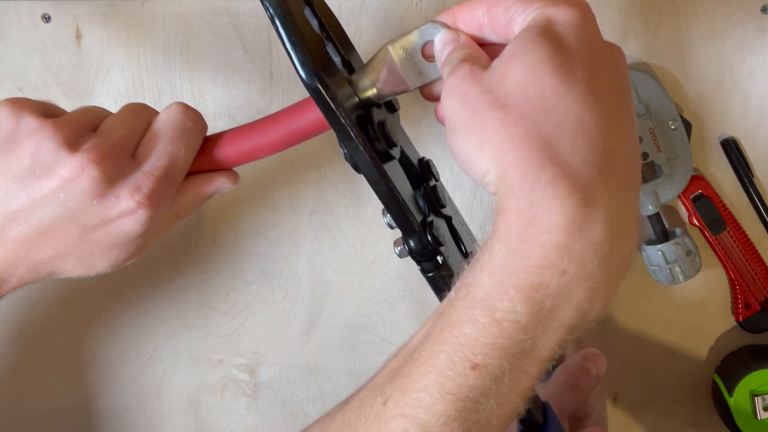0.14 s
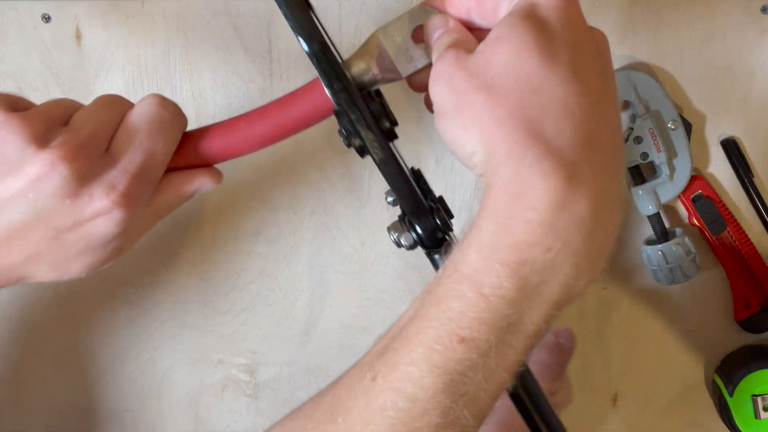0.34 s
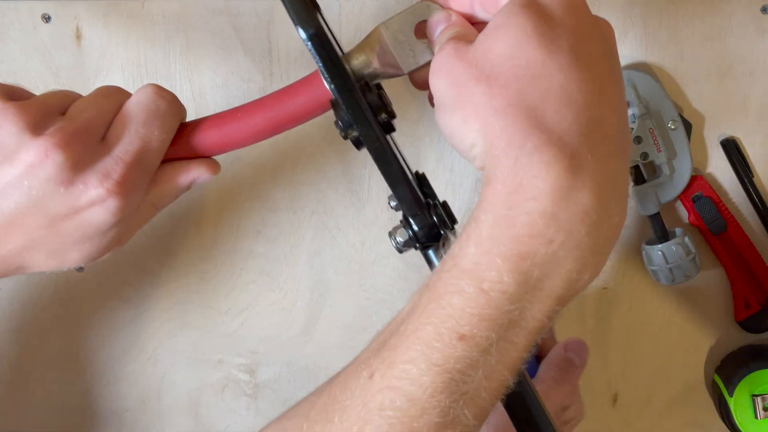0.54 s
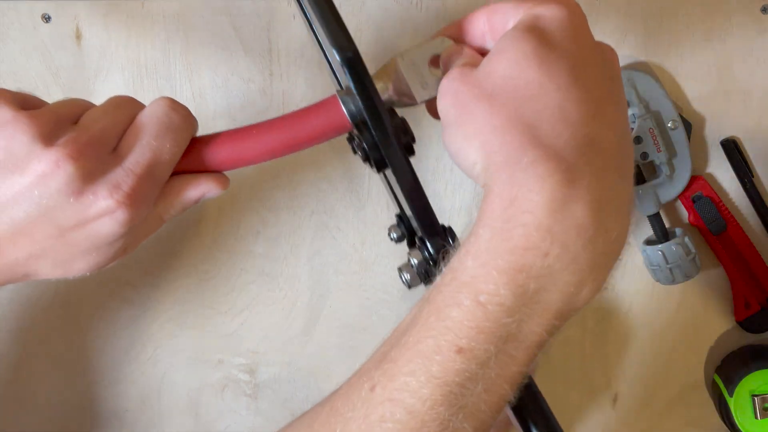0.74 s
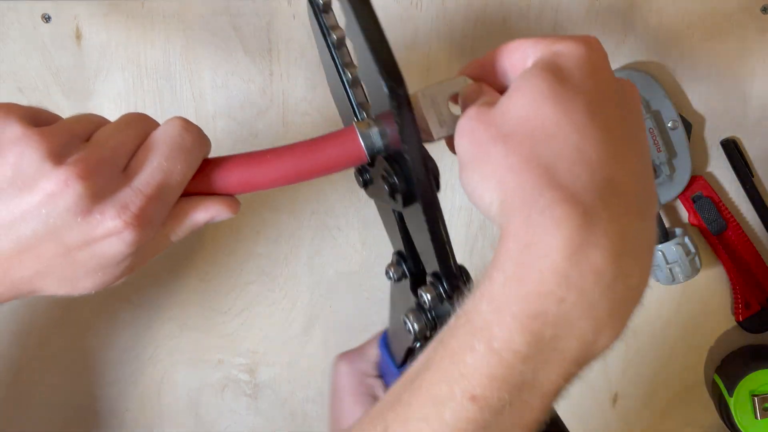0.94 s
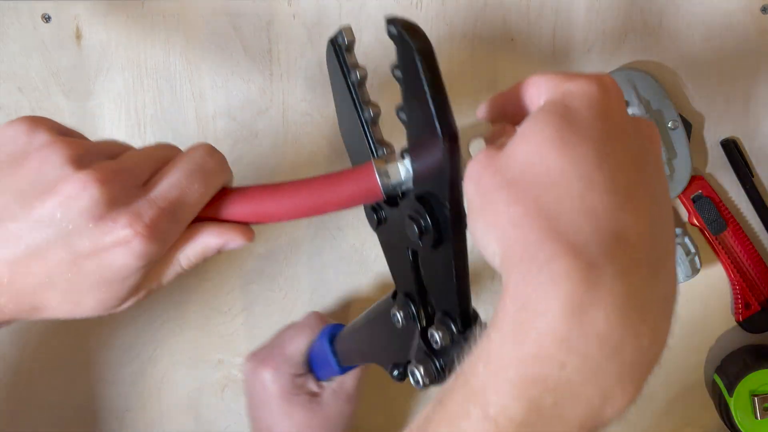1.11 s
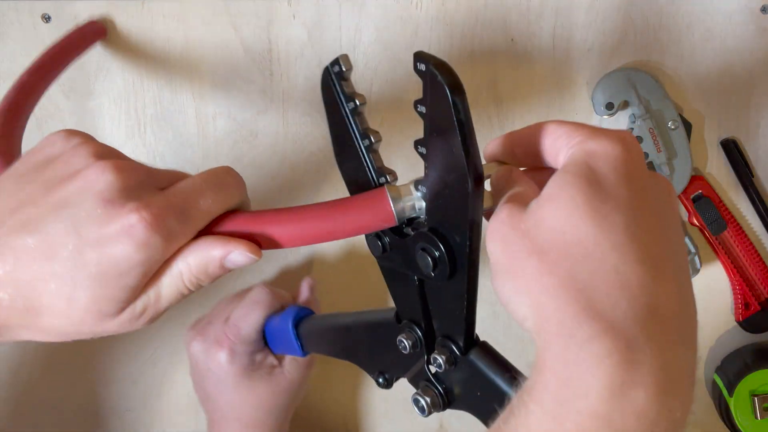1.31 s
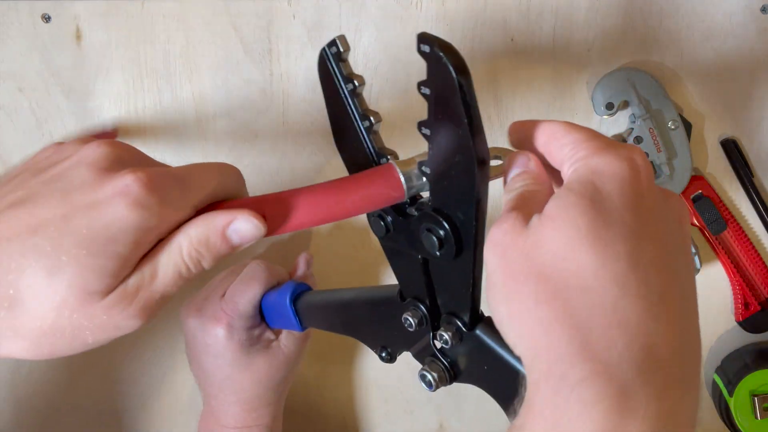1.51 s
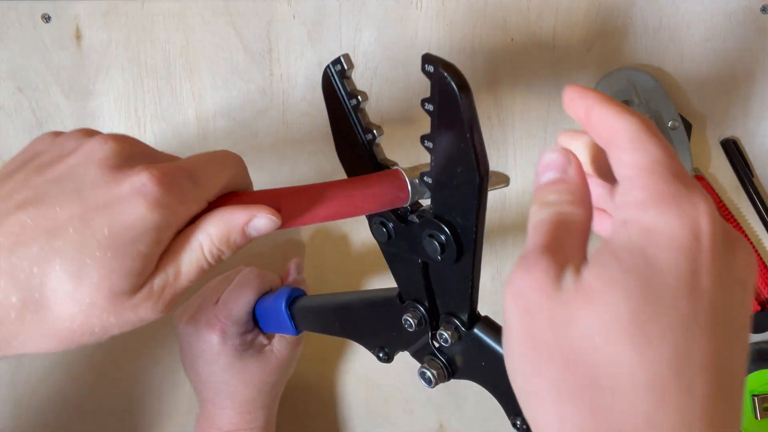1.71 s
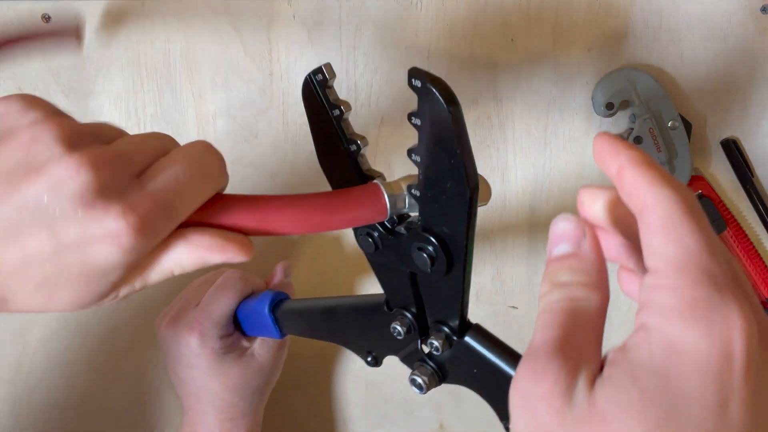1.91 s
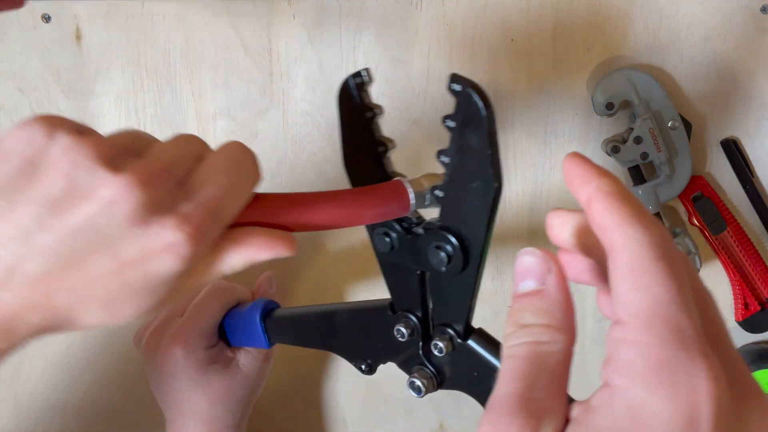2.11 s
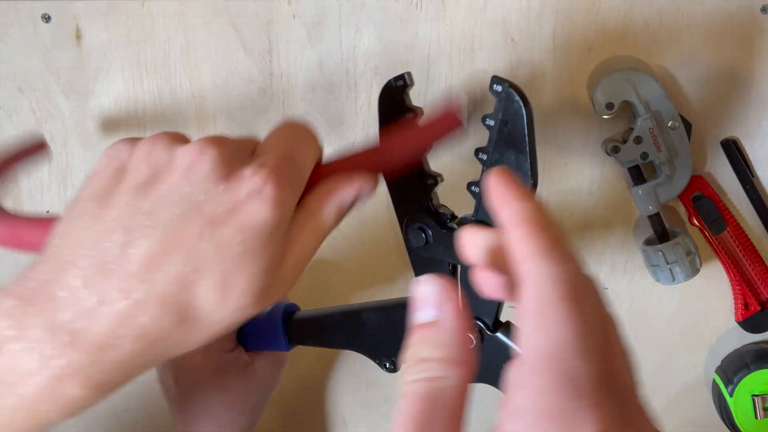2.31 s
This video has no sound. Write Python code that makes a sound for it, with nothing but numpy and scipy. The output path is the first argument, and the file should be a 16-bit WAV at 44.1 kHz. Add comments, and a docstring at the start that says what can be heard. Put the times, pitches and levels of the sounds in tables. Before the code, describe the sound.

A heavy steel crimping tool thumps a wooden bench at 0.22 seconds, loudest and boomy, with a short metallic rattle. Gritty sliding over wood and papery skin and cable rustle follow from 0.35 to 0.7, then faint bumps until 1.1. Duller thuds with jaw clicks land at 1.26 and 1.96; crisp metal clicks come at 2.3. Close phone pickup, short room tail, soft low hush.

```python
"""Crimping tool on a wooden bench

Three heavy thumps and lighter bumps, from a steel crimping tool laid and knocked down, ring the bench top's modes.
Loose jaws and a metal lug click and rattle: sharp touches and random tiny impacts ring steel modes, with noise.
Skids and hands shake the bench, something slides over the wood, and skin and cable rustle as shaped noise.
Behind them are a short room tail and the soft hush of a quiet workshop, heard by a phone just above.
"""
import sys
import numpy as np
from scipy import signal
from scipy.fft import rfft, irfft
from scipy.io import wavfile
from scipy.ndimage import uniform_filter1d

SR = 44100
rng = np.random.default_rng(int(sys.argv[2]) if len(sys.argv) > 2 else 0)


def boost(x):
    """Linear amplitude factor 10**(x/20) for a level x in decibels (scalar or array-like)."""
    u = np.asarray(x, float) / 20
    return 10 ** u


def inscribe(sig):
    """Save sig as 16-bit PCM at rate SR to the path in sys.argv[1].

    A 1-D sig is mono; a 2-D sig holds one channel per row.
    Samples are clipped to [-1, 1] before scaling.
    """
    pcm = np.round(np.clip(np.atleast_2d(sig).T, -1, 1) * 32767)
    wavfile.write(sys.argv[1], SR, pcm.astype(np.int16))


N = 103635
TIME_S = np.arange(N) / SR

# ringing modes of the steel jaws and lug: (frequency [Hz], level [dB], 60 dB fade before the cap [s])
STEEL_MODES = [(640, -14, 0.08), (850, -10, .03), (1010, -13, 0.04), (1230, -7, .03), (1490, -6, 0.025),
               (1690, -9, .03), (2010, -7, 0.02), (2352, -5, 0.035), (2540, -9, 0.04), (2830, -7, 0.03),
               (3055, -4, 0.035), (3540, -10, 0.029), (4450, -12, .03), (5900, -10, .012)]
STEEL_T60_MAX_S = 0.045  # cap on the steel fades


def curve(rows, low_db=-120):
    """Turns rows that start with (time [s], level [dB]) into a gain over time, low_db outside them."""
    r = np.array(rows)
    return boost(np.interp(TIME_S, r[:, 0], r[:, 1], low_db, low_db))


def by_hz(rows):
    """Spreads (frequency [Hz], value) rows over every FFT bin, on a log frequency scale."""
    r = np.array(rows)
    bin_hz = np.arange(N // 2 + 1) * SR / N
    return np.interp(np.log(bin_hz + 1), np.log(r[:, 0]), r[:, 1])


def colour(x, rows):
    """Shapes a sound by a spectrum and brings its rms to 1."""
    y = irfft(rfft(x) * boost(by_hz(rows)), N)
    return y / np.sqrt(np.mean(y ** 2, -1, keepdims=True))


def ring(x, hz, t60):
    """Lets x drive one mode that fades by 60 dB in t60 seconds."""
    pole = np.exp((2j * np.pi * hz - np.log(1000) / t60) / SR)
    return signal.lfilter([1], [1, -pole], x).imag


def flicker(rate, db):
    """Gain that wanders between random levels, rate new ones a second; db sets the depth."""
    k = int(SR / rate)
    steps = np.repeat(rng.standard_normal(N // k + 1), k)
    return boost(0.93 * db * uniform_filter1d(steps, k)[:N])


def grains(rate, spread_db):
    """Tiny impacts at random moments, rate a second on average, a few much bigger."""
    hits = rng.random(N) < rate / SR
    return hits * rng.standard_normal(N) * boost(spread_db * rng.exponential(1, N))


def blows(hz, top_hz):
    """Soft pushes on one mode: low bending waves travel slower, and the place struck weights the mode."""
    # (time [s], level [dB], contact [ms], distance from the phone [m], place across the top [0-1])
    blow_rows = [(0.115, -42.5, 4.9, 0.18, 0.27), (0.2174, -4.5, 1, 0.81, 0.17),
                 (0.254, -17.5, 3.12, 0.78, 0.23), (0.684, -44.5, 3.2, 0.51, 0.27),
                 (0.715, -38.5, 7.3, 0.76, 0.06), (0.976, -43, 6.1, 0.61, 0.09),
                 (1.091, -31.5, 7.5, 0.22, 0.18), (1.255, -32.5, 1.08, 0.47, 0.24),
                 (1.2659, -12.5, 3.57, 0.18, 0.2), (1.2741, -15.5, 6.5, 0.11, 0.15),
                 (1.947, -28.5, 1.9, 0.53, 0.28), (1.951, -21.5, 3.23, 0.12, 0.32),
                 (1.9611, -14.5, 3.58, 0.096, 0.24), (1.9711, -21.5, 3.64, 0.13, 0.32),
                 (2.006, -35, 3.1, 0.13, 0.04), (2.129, -50.5, 4.04, 0.57, 0.29)]
    bend_m_s, shape_turns = 75, 1.306  # wave speed at 100 Hz; how fast mode shapes change across the top
    force, first = np.zeros((2, N)), np.zeros(N)
    for s, blow_db, ms, metres, place in blow_rows:
        at = slice(int(s * SR), int(s * SR) + 2000)
        # delay behind the highest mode
        late = metres / bend_m_s * (np.sqrt(100 / hz) - np.sqrt(100 / top_hz))
        phase = np.clip((TIME_S[at] - s - late) * 1000 / ms, 0, 1)
        # a longer contact is a weaker push, so the impulse stays alike
        push = boost(blow_db) * np.sin(np.pi * phase) ** 2 * 2000 / (ms * SR)
        turn = 2 * np.pi * shape_turns * place * np.sqrt(hz / 100)
        force[:, at] += np.array([[np.cos(turn)], [np.cos(turn + 0.54)]]) * push
        first[at] += push
    return force, first


def skids(hz, rough):
    """Edges skid on the wood: rough grains swell and fade, strongest on modes near each skid's centre."""
    # (start [s], end [s], level [dB], centre [Hz])
    skid_rows = [(0.208, 0.23, -40, 900), (0.563, 0.692, -62.5, 160), (0.606, 0.644, -55.5, 252),
                 (1.041, 1.107, -61.5, 150), (1.048, 1.119, -70, 480), (1.243, 1.264, -56, 500),
                 (1.265, 1.381, -66, 420), (1.915, 1.942, -54, 760)]
    swell = 0
    for start, end, skid_db, mid_hz in skid_rows:
        level = boost(skid_db - 77 * np.log2(hz / mid_hz) ** 2)
        swell = swell + level * np.sin(np.pi * np.clip((TIME_S - start) / (end - start), 0, 1))
    return rough * swell


def handling(hz, grit):
    """Hands press and shift: flickering noise shakes the bench, with a changing tilt to the higher modes."""
    # (time [s], level [dB], tilt [power of frequency over 400 Hz])
    hand_rows = [(0.0, -78.5, 0.24), (0.14, -69.5, 0.089), (0.35, -59, 0.063), (0.49, -62.5, 0.2),
                 (0.76, -69.5, 0.1), (1.23, -74.5, 0.2), (1.39, -69, 0.16), (1.6, -100.5, 0.21),
                 (1.79, -77, 0.31), (1.98, -73, 0.21), (2.09, -84, 0.1), (2.35, -85.5, 0.39)]
    tilt = np.interp(TIME_S, *np.array(hand_rows)[:, ::2].T)
    return grit * curve(hand_rows) * boost(-11.5) * (hz / 400) ** tilt


def bench():
    """Blows, skids and hands ring the modes of the bench top; gives mid and side."""
    # modes of the bench top: (frequency [Hz], level [dB], 60 dB fade [s])
    bench_modes = [(71.62, -7.5, 0.75), (80.25, -23.5, 0.53), (112.94, -2.5, 0.21), (133.97, -5, 0.43),
                   (152.2, -16, 0.6), (179.6, -2.5, 0.22), (208.3, -15, 0.2), (250.6, -8, 0.041),
                   (304, -3.5, .1), (347, -13.5, 0.077), (413.2, -1.5, 0.04), (483.4, -14, 0.13),
                   (518, -4.5, .07), (624, -11.5, 0.089), (723, -6.5, 0.037), (792, -17, 0.039),
                   (1022, -20, .04), (1180.3, -14, 0.015), (1667, -49, .025)]
    waver_hz, waver_db = 22, 4  # each ringing mode wavers randomly in loudness
    first_wave_db, first_wave_t60_s = 6, 0.063  # top gain; longest fade of a 400 Hz mode
    side_db, side_hz = 2, 605  # left-right difference, growing up to this frequency
    grit = rng.standard_normal(N) * flicker(27, 0.67) / 8
    rough = grains(2900, 0.99)
    out = 0
    for hz, db, t60 in bench_modes:
        shake = handling(hz, grit) + skids(hz, rough)
        force, first = blows(hz, bench_modes[-1][0])
        force = force + np.array([shake, np.roll(shake, 40)])
        ringing = ring(force, hz, t60) * flicker(waver_hz, waver_db)
        # the wave that runs straight past the phone before the top settles into ringing
        wave_t60 = min(t60, first_wave_t60_s * (400 / hz) ** 0.31)
        wave = boost(first_wave_db) * min(hz / 250, 1) ** 0.5 * ring(first, hz, wave_t60)
        side = boost(side_db) * min(hz / side_hz, 1) ** 3.2
        out = out + boost(db) * (ringing + [wave, np.roll(wave, 12)]) * [[1], [side]]
    return out


def steel_highpass(x):
    """Thins the bass of the ringing steel."""
    return signal.sosfilt(signal.butter(2, 550, "high", fs=SR, output="sos"), x)


def chatter_noise():
    """Noise in the colour of metal chatter, used for cracks and rattles."""
    # (frequency [Hz], spectral level [dB per Hz])
    noise_colour = [(880, -35), (1500, -11.5), (2800, -10), (10300, -17.5), (11900, -30.5), (12500, -57),
                    (15400, -18.5), (16000, -49.5)]
    return colour(rng.standard_normal(N), noise_colour)


def clicks():
    """Each touch of steel is a tap with fine grains that rings the modes, plus a brief noise crack."""
    # (time [s], level [dB], colour centre [octaves above 1 kHz], crack over click [dB], favoured pitch [Hz])
    click_rows = [(.198, -44.5, 2.3, -16, 4100), (.246, -48, 2.2, -9, 2900), (.262, -46.5, 2.4, -10, 2900),
                  (.890, -54.5, 3.55, -1, 3050), (1.2535, -58.5, 0.29, -2, 1000),
                  (1.259, -40.5, 0.53, -6.5, 1858), (1.281, -49.5, 1.4, -7, 2830),
                  (1.827, -45.5, 2.1, -11.5, 2500), (1.8285, -44, 0.92, -20.5, 1480),
                  (1.9465, -36.5, 3, 6, 3570), (1.9665, -28.5, 0.66, -9, 2134),
                  (2.259, -52, 0.26, -30, 1530), (2.3037, -36.5, 1.9, -6.5, 3030),
                  (2.3065, -32, 0.79, -11.5, 1260)]
    click_octaves, crack_s, contact_s = 1.6, 0.0039, 0.004  # colour width; fades of crack and of grains
    favour_db, favour_octaves = 11, 0.15  # boost of modes that the place struck favours, and its width
    detune = 0.005  # random spread of each mode's pitch, as a fraction
    tune = rng.standard_normal((len(click_rows), len(STEEL_MODES)))
    u = TIME_S[:6000]
    out, crack = np.zeros(N), np.zeros(N)
    for j, (s, click_db, octave, crack_db, favour_hz) in enumerate(click_rows):
        crack += boost(click_db + crack_db) * (TIME_S >= s) * np.exp(-np.abs(TIME_S - s) / crack_s)
        touch = 0.17 * grains(5000, 0.35)[:len(u)] * np.exp(-u / contact_s)
        touch = (touch + (u == 0)) / np.sqrt(1 + np.sum(touch ** 2))
        y = np.zeros(len(u))
        for k, (hz, db, t60) in enumerate(STEEL_MODES):
            tint_db = -13 * ((np.log2(hz / 1000) - octave) / click_octaves) ** 2
            place_db = favour_db * np.exp(-(np.log2(hz / favour_hz) / favour_octaves) ** 2)
            tone = ring(touch, hz * (1 + detune * tune[j, k]), min(t60, STEEL_T60_MAX_S))
            y += boost(click_db + db + tint_db + place_db) * tone
        start = int(s * SR)
        out[start:start + len(u)] += y[:N - start]
    return steel_highpass(out) + chatter_noise() * crack


def rattle():
    """Loose parts chatter: random tiny impacts ring the steel modes shortly, under flickering noise."""
    # (start [s], rise to the peak [s], fade [s], level [dB])
    rattle_rows = [(0.219, 0.042, 0.0052, -44), (1.258, 0.024, 0.0054, -51), (1.3, 0.05, 0.0097, -69.5),
                   (2.254, 0.0086, 0.066, -68.5), (0.97, 0.013, 0.015, -64), (1.828, 0.004, .025, -72.5),
                   (2.303, 0.015, 0.025, -71)]
    chatter = np.zeros(N)
    for s, rise, fade, db in rattle_rows:
        swell = np.clip((TIME_S - s) / rise, 0, 1)
        chatter += boost(db) * swell * np.exp(-np.clip(TIME_S - s - rise, 0, None) / fade)
    loose = grains(859.5, 0.93) * chatter * boost(-3.0)
    # the ringing is shorter than in the clicks
    tones = sum(boost(db) * ring(loose, hz, min(t60, STEEL_T60_MAX_S) * 0.3) for hz, db, t60 in STEEL_MODES)
    return steel_highpass(tones) + chatter_noise() * chatter * flicker(300, 3.6)


def sliding():
    """Something slides over the wood: fine stick-slip grit rings a few broad resonances."""
    # (time [s], level [dB])
    slide_level = [(.3, -77), (.38, -77), (.39, -74), (.44, -64.5), (.52, -70.5), (.62, -73), (.65, -83.5),
                   (.72, -89.5)]
    # (frequency [Hz], width [Hz], level [dB])
    resonances = [(720, 300, -3), (1850, 300, 0), (2250, 350, 0), (4200, 600, -11), (5500, 700, -7)]
    treble_end_s = 0.58  # the highest resonances fall silent first
    grit = rng.standard_normal(N) * flicker(90, 1.7) + grains(610, 1) * 2
    bin_hz = np.arange(N // 2 + 1) * SR / N
    response = sum(boost(db) / (1 + ((bin_hz - hz) * 2 / width) ** 4) for hz, width, db in resonances)
    spectrum = rfft(grit) * response
    low = irfft(spectrum * (bin_hz < 3000), N)
    high = irfft(spectrum * (bin_hz >= 3000), N)
    y = low + high * np.clip((treble_end_s - TIME_S) * 20, 0, 1)
    return y / low.std() * curve(slide_level) * boost(6.0)


def rustle():
    """Skin and cable rustle: patchy papery noise with small ticks."""
    # (time [s], level [dB])
    rustle_level = [(0, -96), (.06, -80.5), (.3, -79), (.37, -69), (.4, -83.5), (.46, -72), (.54, -82),
                    (.6, -83), (.7, -78.5), (.74, -78), (.79, -83.5), (.88, -77), (.94, -85.5),
                    (.99, -77.5), (1.09, -74), (1.14, -93), (1.45, -100)]
    # (frequency [Hz], spectral level [dB per Hz])
    paper_colour = [(590, 8), (1000, -64), (1890, -17.5), (2650, -5.5), (10700, -5.5), (12500, -19),
                    (13900, -9), (16000, -20.5)]
    paper = rng.standard_normal(N) * flicker(40, 2.5) + grains(100, 1.4) * 4
    return colour(paper, paper_colour) * curve(rustle_level, -100) * boost(11.5)


def ports(near):
    """The phone's two ports hear nearby sounds with a level and phase difference, split evenly."""
    # (frequency [Hz], left minus right [dB])
    level_gap = [(60, -7.5), (110, -17.5), (200, -7), (380, -5.5), (700, 13), (1290, 6.5), (2380, -1),
                 (4400, 5), (8120, 0.5), (15000, -0.5)]
    # (frequency [Hz], phase by which left leads [radians])
    phase_gap = [(10, 0), (600, -1.26), (5600, -1.73), (9000, -2.5), (13000, -0.5)]
    left = boost(by_hz(level_gap) / 2) * np.exp(0.5j * by_hz(phase_gap))
    return irfft(rfft(near) * np.array([left, 1 / left]), N)


def room(x):
    """Diffuse echoes: fading noise, different at each port, smears the sound above the bass."""
    t60_s, level_db, low_hz, delay_s = 0.15, -11.5, 350, 0.0062
    t = np.arange(SR // 2) / SR
    tail = rng.standard_normal((2, len(t))) * np.exp(-np.log(1000) * t / t60_s) * (t > delay_s)
    tail = tail / np.sqrt(np.sum(tail ** 2) / 2)
    tail = signal.lfilter([1], [1, -0.4], tail)  # duller
    x = signal.sosfilt(signal.butter(2, low_hz, "high", fs=SR, output="sos"), x)
    return boost(level_db) * signal.fftconvolve(tail, x[None])[:, :N]


def air():
    """Workshop hush: shaped noise, alike in both channels in the bass."""
    # (frequency [Hz], spectral level [dB])
    hush_colour = [(15, -42.5), (25, -2.5), (134, 3), (229, -19), (309, -7), (677, -30), (962, -45.5),
                   (1400, -36.5), (5430, -40.5), (16000, -50.5)]
    mid, side = rng.standard_normal((2, N))
    side = side - uniform_filter1d(side, size=120)  # no bass in the difference
    return colour(np.array([mid + side, mid - side]), hush_colour) * boost(-62) * flicker(9, 0.28)


def scene():
    """Adds the bench, the nearby small sounds, the room and the hush in two channels."""
    wood, side = bench()
    near = clicks() + rattle() + sliding() + rustle()
    direct = ports(near) + [wood * boost(6) + side, wood * boost(4.5) - side]
    return direct + room(near + boost(7.0) * wood) + air()


def roll_off(x):
    """The treble ends steeply here."""
    return signal.sosfilt(signal.butter(12, 16620, fs=SR, output="sos"), x)


def record(dry):
    """The phone cuts the deepest bass and rounds the loudest peaks."""
    limit = 1.15  # level that the rounded peaks approach
    x = signal.sosfilt(signal.butter(5, 63, "high", fs=SR, output="sos"), dry)
    mix = x / (1 + (x / limit) ** 4) ** (1 / 4)
    return roll_off(mix)


dry = scene()
out = record(dry)
inscribe(out)
```